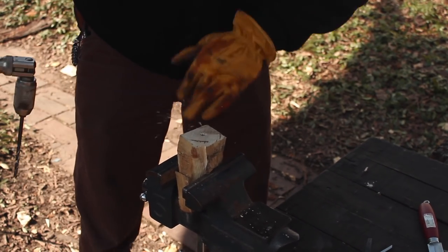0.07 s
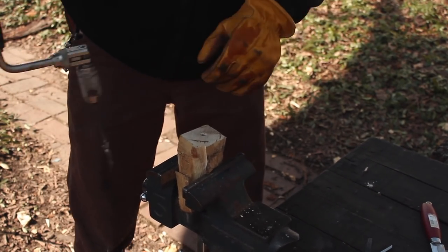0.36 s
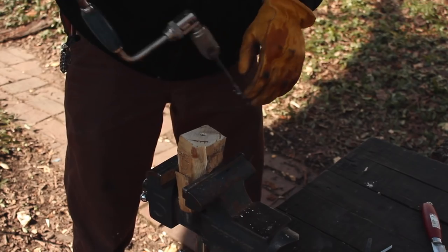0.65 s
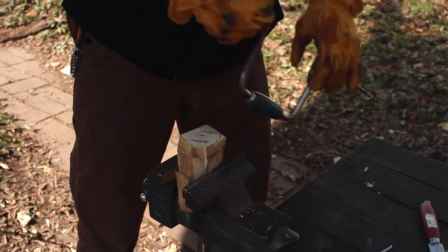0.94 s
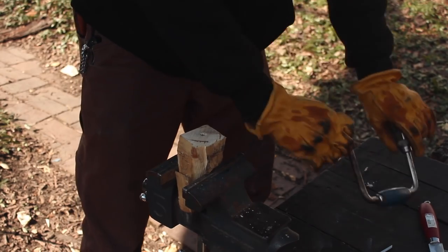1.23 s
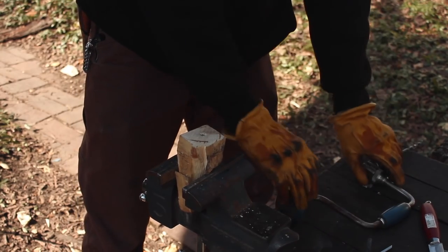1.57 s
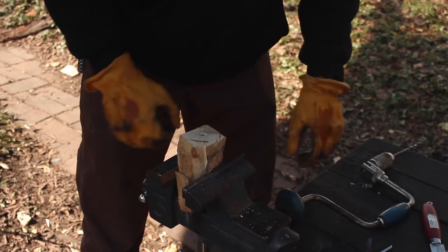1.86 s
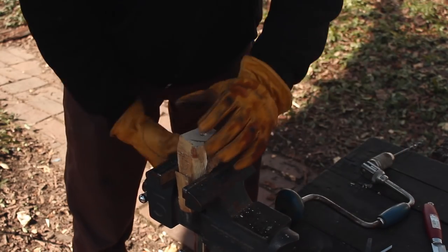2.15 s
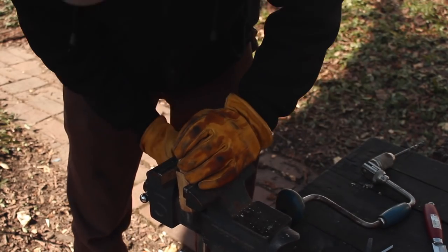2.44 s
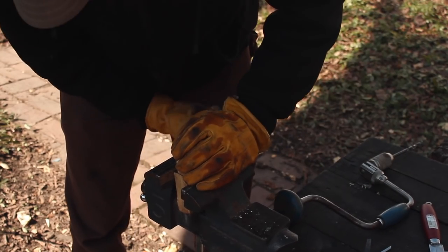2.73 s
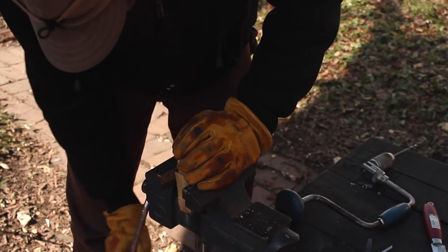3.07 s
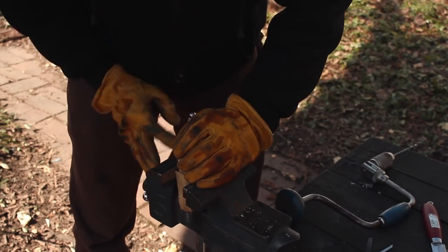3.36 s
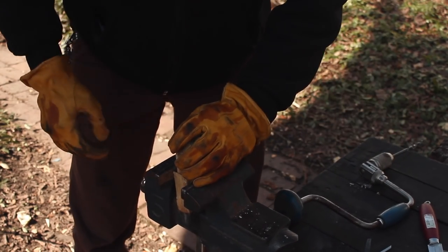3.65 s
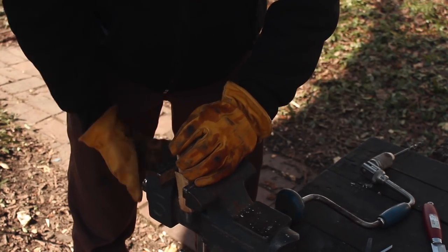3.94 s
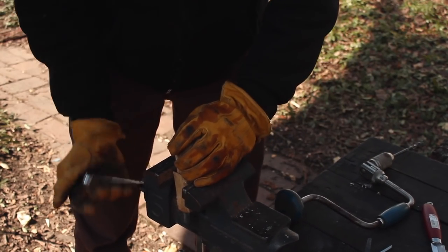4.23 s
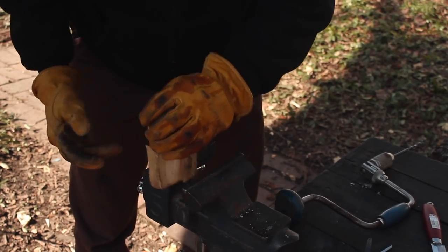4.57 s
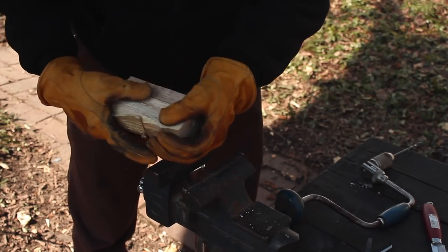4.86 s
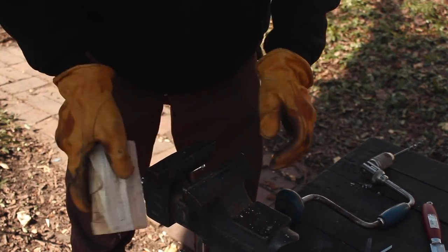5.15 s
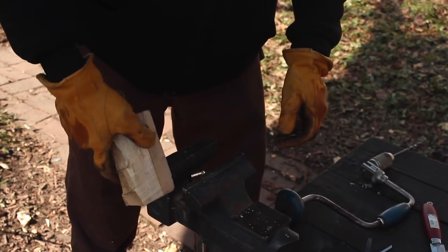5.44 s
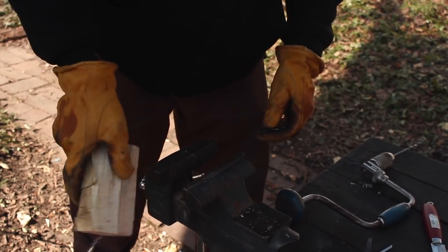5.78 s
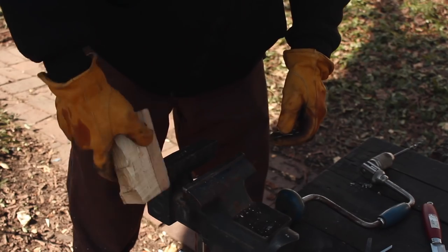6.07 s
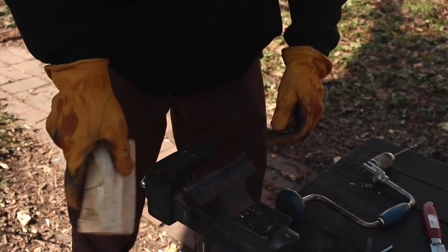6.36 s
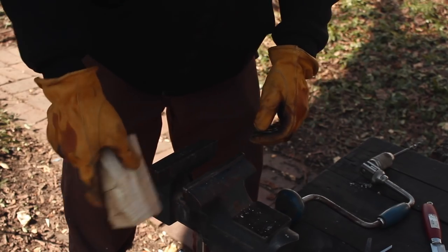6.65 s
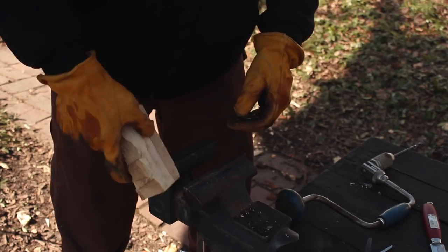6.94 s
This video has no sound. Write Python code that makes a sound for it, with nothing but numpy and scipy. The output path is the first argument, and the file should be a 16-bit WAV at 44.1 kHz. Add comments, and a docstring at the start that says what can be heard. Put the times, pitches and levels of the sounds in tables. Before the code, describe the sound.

Heard close up at an outdoor workbench, a short glove scuff on wood is followed by a steel hand drill bouncing to rest on the boards. The vise handle clanks once and clinks lightly, the screw gives a short scrape, and a wooden block slides free. Nine sharp, regular wooden raps on the iron vise follow, each with a small metallic rattle. Soft air and a low rumble lie underneath, with little echo.

```python
"""Outdoors at a bench vise, over steady air and a low rumble, a glove brushes a wooden block.
A steel hand brace is put down and bounces on the bench, each impact exciting its damped modes.
The vise handle drops and clinks, the screw rubs in its thread, and the block slides out of the jaws.
Rapped nine times on the vise, the block rings briefly, shakes the bench and sets the handle chattering.
A limiter clips the start of each hard blow and ducks the yard after it."""
import sys
import numpy as np
from scipy import signal
from scipy.fft import rfft, irfft, next_fast_len
from scipy.io import wavfile

SR = 44100
rng = np.random.default_rng(int(sys.argv[2]) if len(sys.argv) > 2 else 0)


def put_to_file(sound):
    """Save the sound as 16-bit audio at rate SR, in the file named by the first command-line argument."""
    columns = np.atleast_2d(sound).T  # one column per channel
    safe = np.clip(columns, -1, 1)
    whole_steps = np.round(safe * 32767)
    wavfile.write(sys.argv[1], SR, whole_steps.astype(np.int16))


N = 313482
CLOCK = np.arange(N) / SR  # t/s through the scene
RING_T = np.arange(SR // 2) / SR  # t/s after a blow

# block on vise; the first rap rings longer (two rows): t/s, force/dB, tilt/(dB/octave), bending/dB
RAPS = [(5.327, 12.5, 0, -15), (5.333, 7.5, 1, -3), (5.555, 14, 2.5, -29), (5.7668, 17, 2, -13.5),
        (5.9673, 16, 2.5, -17), (6.1756, 14.5, 1.5, -5.5), (6.3853, 15.5, 2, -41.5),
        (6.5907, 13, -0.5, -38), (6.8057, 14, 2, -21), (7.0243, 16, 0.5, -44)]
# modes of the handle knocking in its socket: f/Hz, level/dB, t60/s
SOCKET_MODES = [(1540, -8, .04), (2300, -7, .04), (3280, 2, .07), (4075, -2, .05), (4764, -8, .06),
                (5351, -7, .04), (7741, -9, .06), (8300, -9, .04), (12340, -19, .05)]
# spectrum of steel's dense, short-lived modes: f/Hz, level/dB
STEEL_CRACK = [(200, -19.5), (900, -5), (1500, -6.5), (2500, 1.5), (4800, -2), (6300, -16), (8000, -12),
               (10000, -26.5), (13000, -37.5), (16000, -32)]


def block():
    """Impact excites heavily damped modes in wood; the point of contact sets how much the block bends."""
    nudges = [(.1022, -15.5, -4.5), (2.353, -16, -1.5), (2.424, -20.5, -1), (2.459, -29.5, -6.5),
              (2.53, -29, -8.5), (2.634, -27.5, 2.5), (3.093, -16.5, -1.5), (3.409, -24.5, -4),
              (3.539, -14.5, -3), (3.566, -22, -3), (4.702, -28, 7.5), (4.89, -25, 4), (4.909, -20, 6.5),
              (4.959, -22, -2), (5.056, -24, 3.5)]  # soft knocks in the jaws: t/s, force/dB, tilt/(dB/octave)
    modes = [(366, -12, 0.055), (474, -6, 0.055), (554, -11, 0.055), (678, -6, 0.055), (754, -7, 0.055),
             (861, -3, 0.06), (996, -4, 0.055), (1125, -3, 0.07), (1276, -9, 0.06), (1367, -8, 0.06),
             (1513, -2, 0.07), (2046, -9, 0.055), (2390, -8, 0.055), (2519, -8, 0.055), (2659, -8, 0.055),
             (2783, -8, 0.055), (3198, -10, 0.055), (3348, -9, 0.055), (3752, -6, 0.06), (3903, -6, 0.06)]  # the wood's resonances: f/Hz, level/dB, t60/s
    bending = [(1594, 0, 0.062)]  # main bending mode: f/Hz, level/dB, t60/s
    crack = [(60, -14.5), (250, 1.5), (450, -1.5), (1200, 6), (1650, 9.5), (2000, -3), (2800, 1),
             (3800, -3), (5000, -11.5), (6200, -18), (8000, -17.5), (11000, -31), (16000, -46)]  # spectrum of the dense modes: f/Hz, level/dB
    raps = blows([row[:3] for row in RAPS], modes, crack, ring_db=-7.5, detune=.007,
                 crack_db=-9, crack_s=.0093, push_db=-3, push_s=.0002)
    for s, force_db, _, bending_db in RAPS:
        add(raps, s, amp(force_db + bending_db) * ring(bending, spread_db=5, detune=.007))
    return raps + blows(nudges, modes, crack, ring_db=-19, detune=.077,
                        crack_db=-8.5, crack_s=.0038, push_db=-8.5, push_s=.0002)


def vise():
    """Mechanical coupling: each rap shakes the bench and rattles the loose handle, which rings the iron."""
    iron_modes = [(2910, -6, .12), (3870, -6, .12), (5950, -2, .11), (7200, -12, .08), (8600, -11, .07),
                  (10080, -3, .13)]  # vise body: f/Hz, level/dB, t60/s
    board_modes = [(79.4, 12.5, .22), (114, 19.5, 0.12), (168.2, 13, 0.28), (232, 11, 0.15), (427, 5, 0.13),
                   (550, 2, 0.05)]  # bench boards: f/Hz, level/dB, t60/s
    rattle_colour = [(500, -12.5), (2000, -7), (3200, 4.5), (4800, 0), (6500, -4.5), (8700, -5.5),
                     (12000, -13), (16000, -21)]  # chatter spectrum: f/Hz, level/dB
    out, size = np.zeros(N), len(RING_T)
    chatter = np.exp(-((RING_T - .038) / .018) ** 2)
    for s, force_db, _, _ in RAPS:
        impulses = rng.standard_normal(size) * (rng.random(size) < 2500 / SR)  # 2500 a second
        contacts = chatter * evened(impulses)
        rattle = amp(-45.5) * coloured(contacts, rattle_colour)
        iron_response = ring(iron_modes, spread_db=5, detune=.00061)
        iron = amp(-56) * evened(signal.fftconvolve(contacts, iron_response)[:size])
        boards = amp(-29) * ring(board_modes, spread_db=4.5, detune=.0053)
        add(out, s, amp(force_db) * (rattle + iron + boards))
    return out


def brace():
    """Inelastic rebounds: the brace bounces to rest on the bench, its body and crank ringing freely."""
    landings = [(1.4385, 6.5, 0.5), (1.441, 4, 6), (1.461, 7, -0.5), (1.492, -1.5, 4), (1.534, 1.5, 5),
                (1.540, 7, 0), (1.558, 3, 2), (1.6135, -4.5, -0.5), (1.6372, 12.5, -1.5), (1.6415, 2, 8),
                (1.696, -4, 2), (1.701, 0, -1), (1.72, -9.5, 2)]  # contacts with the bench: t/s, force/dB, tilt/(dB/octave)
    tinks = [(1.4415, 15.5, -6.5), (1.5795, 0, -7), (1.928, -21.5, -3.5), (1.992, -16.5, -9),
             (2.164, -24, -9.5)]  # blows to the steel crank: t/s, force/dB, tilt/(dB/octave)
    body_modes = [(166, 7, 0.14), (277, -16, 0.32), (205, 2, 0.055), (390, 0, 0.1), (498, 11, 0.089),
                  (674, 13, 0.021), (817, 20.5, 0.063), (1240, 0, 0.039), (1447, 13, 0.035),
                  (2500, -13, .1), (2950, -24, 0.12), (3060, -6.5, 0.28), (3400, -19, .09),
                  (3880, -16, 0.29), (5523, -16, 0.21), (10200, -14, 0.14), (11000, -22, 0.075)]  # brace on the boards: f/Hz, level/dB, t60/s
    crank_modes = [(2110, -22, 0.11), (2326, -8, 0.073), (3050, -3.5, 0.046), (3445, -12, 0.043)]  # crank resonances: f/Hz, level/dB, t60/s
    crack = [(50, -8), (150, 6.5), (400, 6), (900, 7), (1400, 0), (2800, -1.5), (4500, -14.5),
             (8000, -21.5), (11000, -22.5), (16000, -46.5)]  # spectrum of the dense modes: f/Hz, level/dB
    body = blows(landings, body_modes, crack, ring_db=-12, detune=.0028,
                 crack_db=-12.5, crack_s=.0066, push_db=-15, push_s=.0005)
    return body + blows(tinks, crank_modes, STEEL_CRACK, ring_db=-10, detune=.0025,
                        crack_db=-14.5, crack_s=.0084)


def handle():
    """A struck steel bar has inharmonic modes: the handle hits its end stop and clinks as it is spun."""
    drop = [(2.7708, -3.5, 5.5), (2.772, 5, 0.5)]  # blows on the end stop: t/s, force/dB, tilt/(dB/octave)
    clinks = [(3.019, -30.5, 1.5), (3.1445, -11.5, -4), (3.18, -32, 6.5), (3.296, -19.5, 6.5),
              (3.341, -20.5, 2.5), (3.373, -40, 9.5), (3.43, -22, -2), (3.62, -22.5, -3), (4.172, -27, -3),
              (4.298, -18, -2.5), (4.344, -24.5, 1)]  # knocks in the socket: t/s, force/dB, tilt/(dB/octave)
    bar_modes = [(1717, -9, .09), (2218, -7, .08), (3381, -12, 0.12), (4030, -6, 0.13), (4786, -7, 0.09),
                 (5090, -9, 0.11), (7752, -5, 0.13), (8183, -18, 0.11), (12240, -17, 0.11),
                 (12510, -14, 0.07), (13100, -5, 0.075)]  # the sliding bar: f/Hz, level/dB, t60/s
    stop = blows(drop, bar_modes, STEEL_CRACK, ring_db=-13.5, detune=.0006, crack_db=-9, crack_s=.0054)
    return stop + blows(clinks, SOCKET_MODES, STEEL_CRACK, ring_db=-7, detune=.004,
                        crack_db=-12, crack_s=.007)


def ticks():
    """Broadband transients: grit, chips and leather snap without ringing, eight faint ones at random."""
    clear = [(.998, -28.5, 3), (1.003, -29, 4), (2.47, -27, 2.5), (2.475, -26.5, 3.5), (4.843, -57, 13.5),
             (5.085, -18.5, 2.5), (6.24, -41, 14), (6.524, -29, 3), (6.637, -21, 7.5), (6.945, -33, 9.5)]  # placed snaps: t/s, level/dB, tilt/(dB/octave)
    colour = [(300, -40), (2000, 14), (4000, 3.5), (9000, -6), (16000, -11)]  # snap spectrum: f/Hz, level/dB
    out = np.zeros(N)
    faint = [(s, -48 + 2 * rng.standard_normal(), 4) for s in rng.choice(CLOCK, size=8)]
    for s, db, slope_db in clear + faint:
        snap = noise(colour, len(RING_T)) * dying(.01)
        add(out, s, amp(db) * tilted(snap, slope_db))
    return out


def screw():
    """Stick-slip friction in the screw thread drives the handle's resonances."""
    pushes = [(3.15, 0.18, -42.5, -2), (3.37, 0.18, -26.5, 18)]  # turns of the screw: t/s, length/s, level/dB, swell/dB
    colour = [(150, -41), (250, -16), (400, -2), (510, -2), (802, 1), (922, -1), (1180, 3.5), (2360, -2.5),
              (3280, -0.5), (4120, -8), (5830, -16.5), (8700, -20), (16000, -34)]  # friction spectrum: f/Hz, level/dB
    turn = strokes(pushes, attack_s=.0043, crest=.68, release_s=.021)
    friction = rub(turn, colour, slips_per_s=600, grain_db=6, flutter_db=1.8)
    socket = ring(SOCKET_MODES, spread_db=1, detune=.003)
    return friction + amp(-18) * signal.oaconvolve(friction, socket / np.linalg.norm(socket))[:N]


def glove():
    """Sliding friction of leather on the block's end: dense, weak slips merge into a hiss."""
    brush = [(.099, 0.089, -28, 2.5)]  # hand stroke: t/s, length/s, level/dB, swell/dB
    colour = [(240, -44), (400, -45), (676, 1), (1060, -23), (1250, 0), (1990, 0), (2150, -0.5),
              (2320, 3.5), (4880, -9.5), (12900, -17.5), (16000, -23)]  # friction spectrum: f/Hz, level/dB
    stroke = strokes(brush, attack_s=.004, crest=.6, release_s=.0032)
    return rub(stroke, colour, slips_per_s=1600, grain_db=-12, flutter_db=1.8)


def sliding_wood():
    """Sliding friction as the block is drawn out, passed from glove to glove and swung."""
    slides = [(4.53, .18, -36.5, 25), (4.91, 0.11, -40.5, 11), (5.04, .055, -39.5, 12),
              (5.45, 1.65, -61, -7)]  # the block's movements: t/s, length/s, level/dB, swell/dB
    colour = [(300, -10), (1000, -16), (2200, -1.5), (3600, -0.5), (5500, -7), (8000, -7), (15000, -18)]  # friction spectrum: f/Hz, level/dB
    stroke = strokes(slides, attack_s=.015, crest=1, release_s=.0046)
    return rub(stroke, colour, slips_per_s=280, grain_db=-2.5, flutter_db=2.2)


def rasp():
    """Narrow-band friction noise: a faint, thin rasp that fades as the brace is carried."""
    movement = [(.495, 0.27, -53.5, -9.5)]  # one stroke: t/s, length/s, level/dB, swell/dB
    colour = [(1500, -45), (2900, -12), (3350, 19), (3900, 2), (6000, -5), (14000, -14)]  # friction spectrum: f/Hz, level/dB
    stroke = strokes(movement, attack_s=.0088, crest=.53, release_s=.13)
    return rub(stroke, colour, slips_per_s=2000, grain_db=-18, flutter_db=2.1)


def background():
    """Amplitude-modulated noise: nearly steady outdoor air and a low rumble that builds and dies down."""
    air_colour = [(15, -54.5), (25, -17), (92, 1.5), (263, -7), (476, -11), (560, -8.5), (641, -10.5),
                  (818, -7.5), (988, -11), (1400, -16), (2220, -21.5), (3250, -20.5), (4030, -29),
                  (4370, -32.5), (16000, -41)]  # air spectrum: f/Hz, level/dB
    rumble_colour = [(18, -51.5), (35, -1.5), (55, -7.5), (77, 1), (100, -10), (135, -19.5), (250, -51),
                     (600, -78)]  # rumble spectrum: f/Hz, level/dB
    rumble_course = [(0, -61), (1.9, -50.5), (2.68, -33), (2.91, -42.5), (3.34, -31), (3.9, -33),
                     (4.28, -33), (4.5, -23.5), (4.85, -26.5), (5.3, -31), (5.7, -25), (7.1, -33)]  # rumble envelope: t/s, level/dB
    air = amp(-36.5) * noise(air_colour, N) * amp(.21 * drift(per_s=23))
    rumble_db = np.interp(CLOCK, *np.transpose(rumble_course)) + 2 * drift(per_s=5)
    return air + amp(rumble_db) * noise(rumble_colour, N)


def yard(x):
    """Reflection adds close echoes, a short scatter from the bench and a faint one from the yard."""
    echoes = [(.0023, 0.091), (.0047, 0.075), (.0068, 0.092), (.0096, 0.088)]  # from bench, body and ground: delay t/s, gain
    colour = [(80, 8.5), (400, 10), (1500, -1.5), (3500, 2.5), (7000, -6.5), (15000, -4)]  # f/Hz, level/dB
    scatter = noise(colour, len(RING_T)) * (1 - np.exp(-RING_T / .00088))
    near, far = scatter * dying(.16), scatter * dying(.45)
    response = amp(-14.5) * near / np.linalg.norm(near) + amp(-33) * far / np.linalg.norm(far)
    for delay, gain in echoes:
        response[round(delay * SR)] += gain
    return x + signal.oaconvolve(x, response)[:N]


def blows(rows, modes, crack, ring_db, detune, crack_db, crack_s, push_db=-22, push_s=.0001):
    """An impact radiates one push of air, a brief crack of dense modes and the ring of the body struck."""
    out, u = np.zeros(N), RING_T / push_s
    push = -amp(push_db) * np.e * u * (2 - u) * np.exp(-u)
    hold = dying(.96) / np.hypot(1, (RING_T / crack_s) ** 2)
    for s, force_db, slope_db in rows:
        burst = amp(crack_db) * noise(crack, len(u)) * hold
        ringing = amp(ring_db) * ring(modes, spread_db=3, detune=detune)
        add(out, s, amp(force_db) * tilted(push + burst + ringing, slope_db))
    # the blows carry little below about 105 Hz
    return signal.sosfilt(signal.butter(2, 105, "highpass", fs=SR, output="sos"), out)


def ring(modes, spread_db, detune):
    """Damped modes build up during contact and superpose; grip and point of contact vary each blow."""
    chance = rng.standard_normal((len(modes), 2))
    out = np.zeros(len(RING_T))
    for k, ((hz, db, t60), (level_draw, pitch_draw)) in enumerate(zip(modes, chance)):
        tone = np.sin(2 * np.pi * hz * (1 + detune * pitch_draw) * RING_T)
        out += (-1) ** k * amp(db + spread_db * level_draw) * dying(t60) * tone
    build_up = 1 - np.exp(-RING_T / .00044)
    return build_up * out / np.linalg.norm(amp([db for _, db, _ in modes]))


def tilted(x, slope_db):
    """A harder contact tips the spectrum towards the treble, by slope_db per octave."""
    f = np.fft.rfftfreq(2 * len(x), 1 / SR)
    octaves = np.log2(np.clip(f, 200, 12000) / 1800)
    return irfft(rfft(x, 2 * len(x)) * amp(slope_db * octaves))[:len(x)]


def rub(stroke, colour, slips_per_s, grain_db, flutter_db):
    """Stick-slip friction: a fine hiss and many tiny slips of uneven size, each a brief scratch."""
    slips = rng.standard_normal(N) * (rng.random(N) < slips_per_s / SR)
    scratches = np.sqrt(smoothed(slips ** 2, lag_s=.0007)) * rng.standard_normal(N)
    drive = rng.standard_normal(N) + amp(grain_db) * evened(scratches)
    return coloured(drive, colour) * stroke * amp(flutter_db * drift(per_s=170))


def strokes(rows, attack_s, crest, release_s):
    """Friction follows pressure: a stroke bites, ramps for the share crest of its length, holds, lets go."""
    gain = np.zeros(N)
    for start, length, db, swell_db in rows:
        t = np.maximum(CLOCK - start, 0)
        ramp = np.minimum(t / (crest * length), 1)
        release = np.exp(-np.maximum(t - length, 0) / release_s)
        gain += np.minimum(t / attack_s, 1) * amp(db - swell_db * (1 - ramp)) * release
    return gain


def amp(db):
    """Decibels to amplitude ratio."""
    return 10 ** (np.asarray(db) / 20)


def evened(x):
    """Normalisation to rms 1."""
    return x / np.sqrt(np.mean(x ** 2) + 1e-20)


def add(mix, s, sound):
    """Superposes a sound on the mix at time s."""
    part = mix[round(s * SR):][:len(sound)]
    part += sound[:len(part)]


def dying(t60):
    """Exponential decay of 60 dB in t60 seconds."""
    return np.exp(-np.log(1000) * RING_T / t60)


def coloured(x, spectrum):
    """Filters x by a spectral envelope, to rms 1."""
    hz, db = np.transpose(spectrum)
    size = next_fast_len(len(x))
    f = np.fft.rfftfreq(size, 1 / SR)
    gain = amp(np.interp(np.log(f + 1), np.log(hz), db))
    return evened(irfft(rfft(x, size) * gain, size)[:len(x)])


def noise(spectrum, size):
    """Filtered Gaussian noise of rms 1."""
    return coloured(rng.standard_normal(size), spectrum)


def drift(per_s):
    """Random modulation of rms 1, interpolated between per_s values a second."""
    return evened(np.interp(CLOCK * per_s, np.arange(N // 50), rng.standard_normal(N // 50)))


def smoothed(x, lag_s):
    """First-order low-pass with time constant lag_s."""
    pole = np.exp(-1 / (lag_s * SR))
    return signal.lfilter([1 - pole], [1, -pole], x)


def limiter(x, threshold_db, attack_s, recovery_db_per_s):
    """Gain control: power over the threshold turns the level down quickly, and it creeps back."""
    power = smoothed((x ** 2).mean(0), lag_s=.00048)
    over_db = np.maximum(10 * np.log10(power + 1e-12) - threshold_db, 0)
    recovery_db = CLOCK * recovery_db_per_s
    reduction_db = np.maximum.accumulate(over_db + recovery_db) - recovery_db
    return x / amp(smoothed(reduction_db, attack_s))


def scene():
    """Superposition: all sources sum to a nearly mono sound."""
    work = block() + vise() + brace() + handle() + ticks() + screw() + glove() + sliding_wood()
    sound = amp(1) * yard(work) + background() + rasp()
    # left and right differ faintly in the treble
    hiss = amp(-58.5) * noise([(3500, -26.5), (5500, -5), (16000, -3.5)], N)
    side = .0067 * np.gradient(sound) + hiss
    return np.array([sound + side, sound - side])


def record(dry):
    """Limiting, clipping of the peaks that outrun it, and a band limit at 15.9 kHz."""
    limited = limiter(dry, threshold_db=-6.5, attack_s=.0036, recovery_db_per_s=25)
    lowpass = signal.firwin(511, 15900, window=("kaiser", 9), fs=SR)
    return signal.oaconvolve(np.clip(limited, -1, 1), lowpass[None], "same")


dry = scene()
out = record(dry)
put_to_file(out)
```